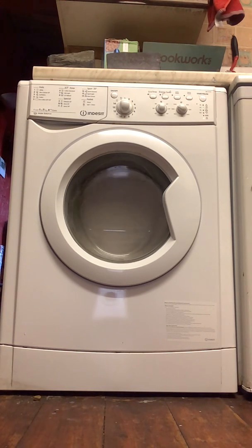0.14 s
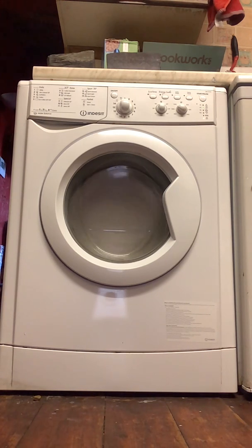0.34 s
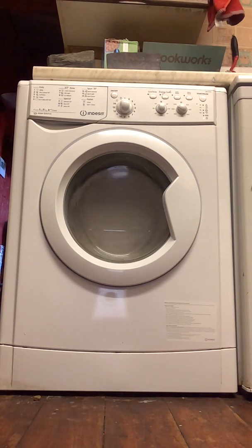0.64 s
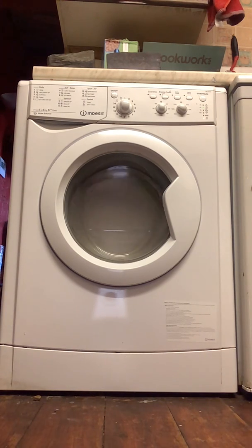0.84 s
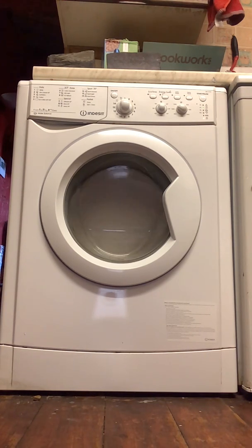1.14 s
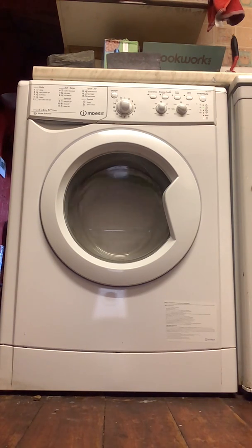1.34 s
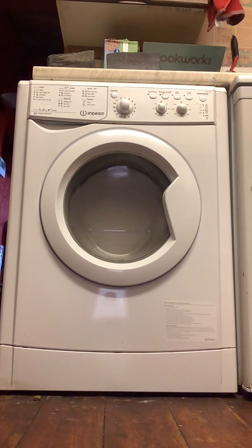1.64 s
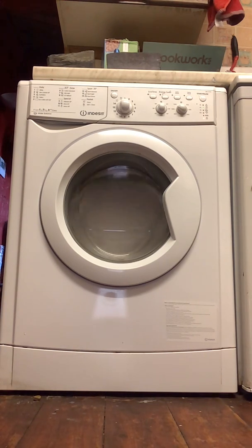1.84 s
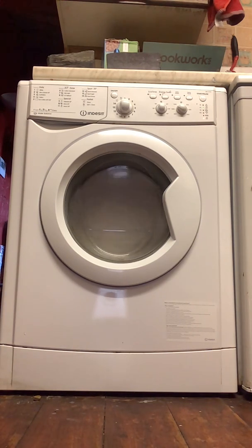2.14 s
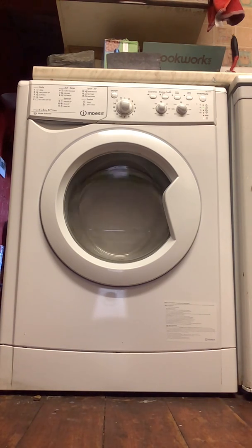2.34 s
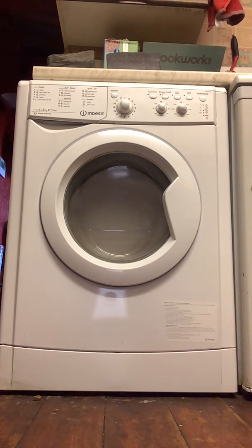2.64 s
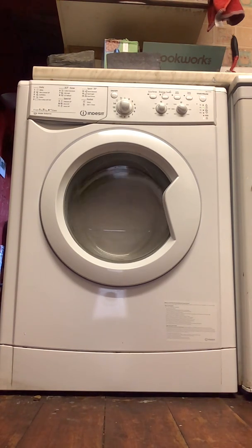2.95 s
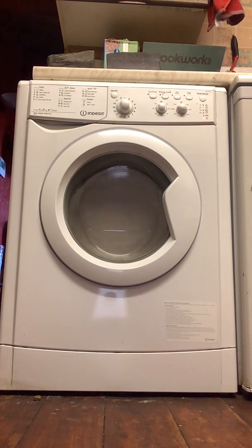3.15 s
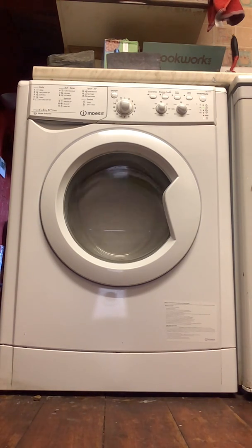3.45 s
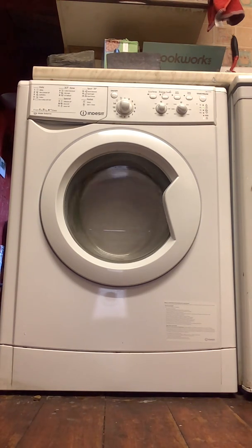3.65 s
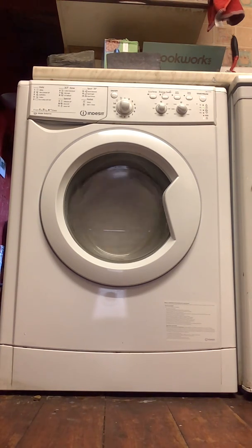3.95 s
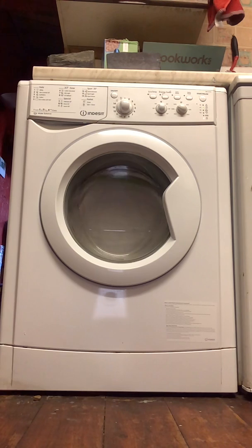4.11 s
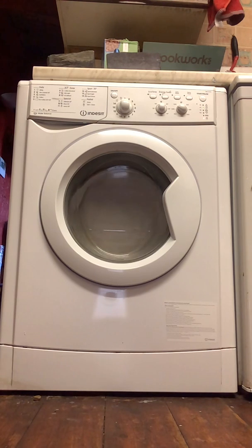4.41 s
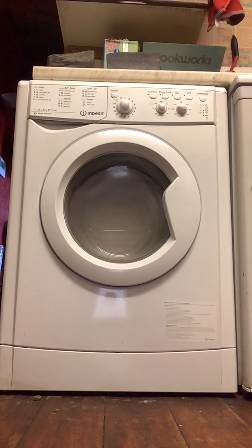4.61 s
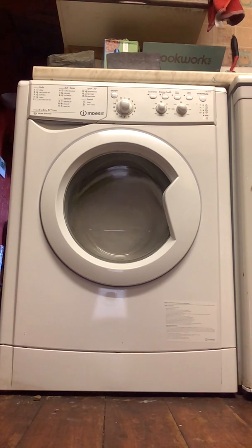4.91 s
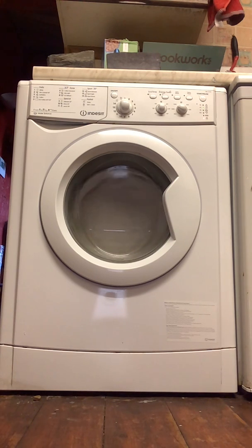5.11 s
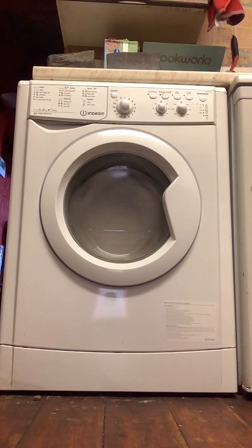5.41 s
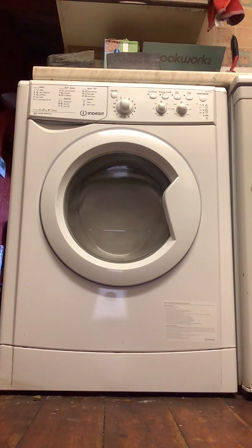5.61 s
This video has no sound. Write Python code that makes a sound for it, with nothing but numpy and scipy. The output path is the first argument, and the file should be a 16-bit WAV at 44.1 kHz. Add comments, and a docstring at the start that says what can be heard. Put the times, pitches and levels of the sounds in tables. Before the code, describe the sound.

In a small room, one close microphone hears a front-loading washing machine slowing from its spin, with identical sound in both channels. A bright, buzzing motor whine, rich in high metallic overtones, starts near 1070 Hz and glides down almost evenly, wavering slightly as the uneven load turns. From 0 to 0.75 s the cabinet shudders with a hollow low rattle and several panel knocks, the hardest around 0.4 to 0.5 s. Three tiny shivers follow between 0.85 and 1.3 s, then a second long shudder with lighter knocks from 1.45 to 2 s, and one last brief tremor near 2.35 s. Gritty brush scrape and treble hiss rise after 1.35 s, with the scrape strongest near 2.5 s, then fade from about 3.4 s. By 4.8 s the whine is quieter and cleaner, settling near 560 Hz, while low mains hum grows beneath until the end at about 5.8 s.

```python
"""In a small room, one microphone hears a front-loading washing machine slow from its spin.
The motor brushes click over the commutator and whine through the steel cabinet, with a scrape and a
treble hiss; the uneven load makes the speed waver once a drum turn. The cabinet shudders on the floor
boards in two long bouts and four brief ones, and its panels knock. Mains hum and a faint room noise lie
beneath. The whine is a set of sines, the hisses are coloured noise, the cabinet is a set of resonances."""
import sys
import numpy as np
from scipy import signal
from scipy.fft import rfft, irfft, next_fast_len
from scipy.io import wavfile
from scipy.ndimage import uniform_filter1d, map_coordinates

SR = 44100
rng = np.random.default_rng(int(sys.argv[2]) if len(sys.argv) > 2 else 0)


def log_audio(samples):
    """Write samples as a 16-bit WAV file to the path given in sys.argv[1]."""
    # one column per channel
    frames = np.atleast_2d(samples).T
    # limit to full scale, then quantise
    limited = np.clip(frames, -1, 1)
    pcm = np.round(limited * 32767).astype(np.int16)
    wavfile.write(sys.argv[1], SR, pcm)


N = 254456  # samples

# commutator bars passing the brushes: time_s, mean_rate_hz, waver_hz (once a drum turn)
BAR_RATE = [(0, 1071.8, 6.7), (1.5, 914.9, 8.3), (3, 760.4, 12), (4.2, 633.1, 14.1), (4.8, 577.7, 17.1),
            (5.2, 560.5, 16), (5.77, 558.1, 8.1)]
# motor tones in time: time_s, whine_db, slot_tones_against_bar_tones_db, lowest_bar_tone_extra_db
MOTOR_LEVELS = [(0, -44, 3.5, 10), (.5, -42.5, -1.5, 6), (.9, -44, 1.5, 4), (1.3, -45.5, 3, 5.5),
                (1.5, -45, -2, -1), (1.75, -45, -17, -9), (1.9, -43, -21, 4), (2.5, -43, -6, -5),
                (2.8, -44, -8, -6.5), (2.95, -39.5, -10, 3), (3.3, -42, -9, 2.5), (3.6, -44, -25, 6),
                (4.0, -44, -16, 4), (4.27, -47.5, -5.5, 4), (4.8, -48, -1.5, 7), (5.4, -48, 1, 9),
                (5.77, -47, 0, 6)]
# tones at whole multiples of the bar rate: multiple, level_db
BAR_TONES = [(1, -2.5), (2, 1.5), (3, 1.5), (4, 1.5), (5, 0.5), (6, 1), (7, -1.5), (8, -3.5), (9, -2.5),
             (10, -1.5), (12, -1), (14, -2.5), (17, -7), (28, -6)]
# rotor slot tones, halfway between the bar tones: multiple, level_db
SLOT_TONES = [(.5, -13), (1.5, -6.5), (2.5, -13.5), (3.5, -8), (4.5, -36), (5.5, -10), (6.5, -7), (7.5, -8),
              (8.5, -4), (9.5, -8), (10.5, -6.5), (12.5, -11), (28, -27)]
# throb of each tone, as the armature is not quite round: cycles_per_shaft_turn, level_db (scaled per tone)
OUT_OF_ROUND_THROBS = [(1, -21), (2, -15), (3, -19), (4, -25), (5, -24), (9, -23)]
# resonances of cabinet and motor shell: pitch_hz, width_hz, level_db
CABINET_MODES = [(536.4, 14.5, -14), (631, 16, -15), (734.4, 25.3, -3), (899, 14, -2), (934.5, 16, -12.5),
                 (1109.4, 96, -10.5), (1126.5, 100, -9.5), (1354, 83, -16.5), (1567, 30, -16),
                 (1716, 40.5, -7.5), (1981, 107, -9.5), (2441, 100, -10.5), (2730, 295, -12.5),
                 (3165, 236, -12.5), (3428, 29, -4), (3639, 74, -0.5), (4131, 62, 0.5), (4354, 145, 0),
                 (4740, 240, 3.5), (5422, 274, -0.5), (5907, 103, -1), (6400, 450, -6), (7260, 390, -8),
                 (7896, 270, -6), (8840, 1350, -13.5), (10370, 1030, -10.5), (11660, 4000, -16),
                 (13950, 1600, -16.5), (15400, 1100, -29)]
# brush noise in time: time_s, scrape_db, treble_hiss_db
BRUSH_LEVELS = [(0, -50, -70), (.5, -51.5, -72), (1.16, -53.5, -75), (1.35, -48, -56), (1.6, -43.5, -50),
                (2.0, -41.5, -53.5), (2.5, -40.5, -56), (2.9, -44.5, -54), (3.35, -45, -52.5),
                (3.86, -48.5, -56), (4.2, -53.5, -59), (4.8, -57.5, -64), (5.77, -59, -66)]
# colour of the scrape, on top of the cabinet resonances: pitch_hz, level_db
SCRAPE_COLOUR = [(500, -10), (900, -21), (1500, -12.5), (2500, -11.5), (3500, 3), (4600, 6.5), (5600, 0),
                 (7000, 4), (9000, 4.5), (12000, -8), (15700, 6.5)]
# colour of the treble hiss: pitch_hz, level_db
TREBLE_COLOUR = [(3000, -38), (6000, -19), (8000, 2), (10000, 0), (12700, 5.5), (14500, -6), (15700, -9)]
# bouts of shudder at full level: start_s, length_s, panels_db, floor_boards_db
SHUDDER_BOUTS = [(0, 0.73, -48.5, -60), (0.854, 0.037, -64, -64), (1.035, 0.053, -62, -68),
                 (1.26, 0.061, -63, -72), (1.447, 0.533, -50.5, -67.5), (2.342, 0.049, -62.5, -74)]
# faint rumble under and between the bouts: time_s, panels_db, floor_boards_db
RUMBLE_LEVELS = [(0, -67, -73), (2.3, -67, -75), (4, -69, -76.5), (5.4, -68, -73), (5.77, -61.5, -70)]
# panel knocks: start_s, level_db
PANEL_KNOCKS = [(0.097, 0), (0.154, 0), (0.245, -6), (0.28, -0.5), (0.375, 5.5), (0.505, 5.5),
                (0.617, -0.5), (0.719, 0), (1.466, -7), (1.495, 5), (1.554, -3), (1.665, -6), (1.748, -3),
                (1.95, -4)]
# panel resonances, rung by jolts and knocks: pitch_hz, width_hz, level_db
PANEL_MODES = [(165.7, 14, -2), (229.7, 15.3, 5.5), (305, 39.6, -2), (424, 68, -6), (548.7, 25, -0.5),
               (630, 46, -7.5), (743, 49.5, -2), (801, 84, -7), (1344, 260, -20)]
# floor board resonance, applied twice: pitch_hz, width_hz, level_db (of one pass)
BOARD_MODES = [(100, 78, 0)]
# mains hum: multiple_of_mains, level_while_slowing_db, level_while_speed_holds_db (rms)
HUM_TONES = [(4, -84, -67.5), (6, -72.5, -64.5), (8, -60, -58), (10, -87, -76.5)]
# colour of the room noise: pitch_hz, level_db
ROOM_COLOUR = [(15, -72), (25, -23), (294, -20.5), (345, -14.5), (397, -3), (580, -23), (668, -6),
               (849, -30), (1320, -13), (1520, -12.5), (3000, -13), (3900, -10), (6600, -120)]

BAR_COUNT = 36  # commutator bars in one shaft turn
BARS_PER_DRUM_TURN = 435  # through the belt drive
LOAD_STARTS_TURNS = 0.405  # where the load sits at the start
TOP_HZ = 15750  # nothing is kept above this
SHUDDER_ATTACK_S, SHUDDER_RELEASE_S = 0.04, 0.062
CRACK_DB = -26  # the bright edge of a knock against its thud, before each rings its resonances
MAINS_HZ = 49.91
HOLD_S, HOLD_RISE_S = 4.86, 0.21  # the hum's change as the motor stops slowing: centre, length
DROPOUT_S, DROPOUT_WIDTH_S, DROPOUT_DB = 5.44, 0.17, 27  # the eighth multiple of the hum dips briefly
ROOM_DB = -62.5


def motor():
    """Commutator and slot tones ring the cabinet, brushes scrape a track, and walls answer both."""
    mean_hz, waver_hz = curves(BAR_RATE)
    drum_turns = np.cumsum(mean_hz) / SR / BARS_PER_DRUM_TURN + LOAD_STARTS_TURNS
    bar_hz = mean_hz + waver_hz * np.sin(2 * np.pi * drum_turns)  # the load is lifted, then falls
    shaft_turns = np.cumsum(bar_hz) / SR / BAR_COUNT
    whine_db, slot_db, lowest_db = curves(MOTOR_LEVELS)
    scrape_db, treble_db = curves(BRUSH_LEVELS)

    tones = motor_tones(bar_hz, shaft_turns, slot_db, lowest_db)
    whine = filtered(amp(whine_db) * tones, modes(CABINET_MODES))
    scrape = amp(scrape_db) * brush_scrape(shaft_turns)
    treble = amp(treble_db) * hiss(TREBLE_COLOUR, patchy_db=1.5)
    return walls(whine + scrape, t60=0.13, wet_db=-5.5) + treble


def motor_tones(bar_hz, shaft_turns, slot_db, lowest_db):
    """Sines at whole and half multiples of the bar rate throb with the shaft and flutter at random."""
    phase = 2 * np.pi * BAR_COUNT * shaft_turns
    phase = phase + .025 * wobble(50) + .008 * wobble(300)  # jitter in radians
    throbs = np.array([amp(db) * np.exp(2j * np.pi * n * shaft_turns) for n, db in OUT_OF_ROUND_THROBS])
    tones = np.zeros(N)
    for multiple in np.arange(1, 57) / 2:
        if multiple % 1 == 0:
            level_db = along(BAR_TONES, multiple) + (multiple == 1) * lowest_db
        else:
            level_db = along(SLOT_TONES, multiple) + slot_db
        # each tone throbs with its own phases, higher tones more deeply
        turned = np.exp(2j * np.pi * rng.random(len(throbs))) @ throbs
        throb = 1 + 2 * min(multiple / 4, 1.1) * np.real(turned)
        flutter_db = min(multiple / 3, 1) * (1.61 * wobble(12) + 2.38 * wobble(45))
        in_band = multiple * bar_hz < TOP_HZ
        tone = np.sin(multiple * phase + 2 * np.pi * rng.random())
        tones += amp(level_db + flutter_db) * throb * in_band * tone
    return tones


def brush_scrape(shaft_turns):
    """Brushes scrape the same worn track on every shaft turn, mixed with fresh random friction."""
    track = rng.standard_normal(1600)
    worn = unit(map_coordinates(track, [shaft_turns % 1 * len(track)], mode="grid-wrap"))
    friction = worn + 0.7 * rng.standard_normal(N)
    ring = modes(CABINET_MODES)
    # part rings the cabinet, part leaves by the vents
    heard = filtered(friction, lambda hz: 0.27 + ring(hz))
    return hiss(SCRAPE_COLOUR, patchy_db=3.0, source=heard)


def cabinet_shudder():
    """Dense small jolts ring the panels, and steady noise rings the floor boards, in bouts."""
    panel_gain, board_gain = bouts()
    jolts = rng.standard_normal(N) * amp(1.7 * wobble(25) + 2 * wobble(90))
    panels = unit(filtered(jolts, modes(PANEL_MODES)))
    boards = unit(filtered(rng.standard_normal(N), lambda hz: modes(BOARD_MODES)(hz) ** 2))
    return panel_gain * panels + board_gain * boards


def bouts():
    """Gains of panels and boards: each bout rises, holds and stops over the faint rumble."""
    t = np.arange(N) / SR
    gains = amp(curves(RUMBLE_LEVELS))
    for start, length, *level_db in SHUDDER_BOUTS:
        rise = (t - start) / SHUDDER_ATTACK_S + 1  # begins ahead of start
        fall = (start + length - t) / SHUDDER_RELEASE_S + 1
        shape = np.clip(np.minimum(rise, fall), 0, 1)
        gains = gains + amp(level_db)[:, None] * shape ** 2
    return gains


def panel_knocks():
    """Each hard contact and its chatter ring the panels as a thud, with a brighter crack."""
    thuds, cracks = np.zeros(N + SR), np.zeros(N + SR)
    t = np.arange(SR // 20) / SR
    for start, level_db in PANEL_KNOCKS:
        # the panel chatters after the contact, falling 60 dB in 25 ms
        blow = .1 * amp(-60 * t / .025) * rng.standard_normal(len(t))
        blow[0] = 1
        thuds[round(start * SR):][:len(t)] += amp(level_db) * blow
        cracks[round(start * SR):][:len(t)] += amp(level_db + CRACK_DB) * blow
    # rubber feet blunt each contact
    soft = lambda hz: modes(PANEL_MODES)(hz) / (1 + 1j * hz / 1500) ** 2
    return filtered(thuds[:N], soft) + filtered(cracks[:N], modes([(1300, 210, 0)]))


def hum():
    """The field windings buzz at even multiples of the mains, more richly once the speed holds."""
    t = np.arange(N) / SR
    phase = 2 * np.pi * MAINS_HZ * t + 0.027 * wobble(3.2)
    holding = np.clip((t - HOLD_S) / HOLD_RISE_S + .5, 0, 1)
    dropout_db = DROPOUT_DB * np.exp(-((t - DROPOUT_S) / DROPOUT_WIDTH_S) ** 2)
    total = np.zeros(N)
    for multiple, slowing_db, held_db in HUM_TONES:
        multiple = round(multiple)
        level_db = slowing_db + (held_db - slowing_db) * holding + 0.42 * wobble(7.1)
        level_db = level_db - (multiple == 8) * dropout_db
        total += np.sqrt(2) * amp(level_db) * np.sin(multiple * phase)
    return total


def room_noise():
    """The room's own faint noise, coloured and slightly patchy."""
    return amp(ROOM_DB) * hiss(ROOM_COLOUR, patchy_db=1.0)


def walls(x, t60, wet_db):
    """The direct sound plus a short diffuse answer of the room, falling 60 dB in t60 seconds."""
    t = np.arange(SR // 4) / SR
    tail = rng.standard_normal(len(t)) * amp(-60 * t / t60) * (t > .003)
    return x + amp(wet_db) * signal.fftconvolve(x, tail / np.linalg.norm(tail))[:N]


def hiss(colour, patchy_db, source=None):
    """Coloured noise of rms 1 with patches of random gain in time and frequency."""
    source = rng.standard_normal(N) if source is None else source
    z = signal.stft(source, nperseg=512)[2]
    patches = uniform_filter1d(rng.standard_normal(z.shape), 4, 0)
    patches = uniform_filter1d(patches, 4, 1)
    noise = signal.istft(z * amp(patchy_db * unit(patches)), nperseg=512)[1][:N]
    return unit(filtered(noise, lambda hz: amp(along(colour, hz))))


def modes(table):
    """The causal response of a set of resonances, with alternating signs."""
    def response(hz):
        total = 0
        for k, (centre, width, db) in enumerate(table):
            damping = 1j * hz * width
            total = total + (-1) ** k * amp(db) * damping / (centre * centre - hz * hz + damping)
        return total
    return response


def filtered(x, response):
    """x times a complex response of frequency."""
    m = next_fast_len(N + SR // 2)
    return irfft(rfft(x, m) * response(np.fft.rfftfreq(m, 1 / SR)), m)[..., :N]


def wobble(rate):
    """A smooth random curve, rate knots a second."""
    return map_coordinates(rng.standard_normal(int(N * rate / SR) + 4), [np.arange(N) * rate / SR])


def curves(rows):
    """One value per sample for each column after the time."""
    s, *columns = np.transpose(rows)
    return [np.interp(np.arange(N) / SR, s, column) for column in columns]


def along(points, at):
    """Values between (position, value) points on a log axis."""
    position, value = np.transpose(points)
    return np.interp(np.log(at + 1e-3), np.log(position + 1e-3), value)


def amp(db):
    """dB to gain."""
    return 10 ** (np.asarray(db) / 20)


def unit(x):
    """Scaled to rms 1."""
    return x / np.sqrt(np.mean(x ** 2) + 1e-20)


def scene():
    """One microphone feeds both channels."""
    sound = motor() + cabinet_shudder() + panel_knocks() + hum() + room_noise()
    return np.array([sound, sound])


def record(dry):
    """The recorder drops the deep bass, fades in the top treble and keeps nothing above its band limit."""
    bass_cut = lambda hz: (1j * hz / (75 + 1j * hz)) ** 3
    # 3 dB lost per kHz above 13.2 kHz
    treble_fade = lambda hz: amp(-3 * np.clip(hz / 1000 - 13.2, 0, None))
    return filtered(dry, lambda hz: (hz < TOP_HZ) * treble_fade(hz) * bass_cut(hz))


dry = scene()
out = record(dry)
log_audio(out)
```